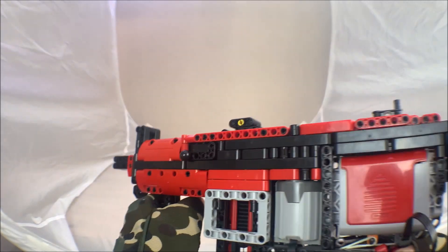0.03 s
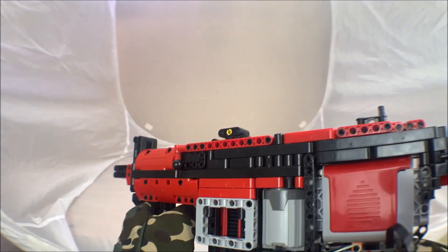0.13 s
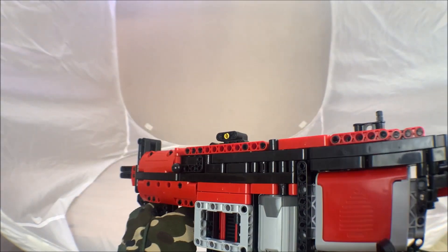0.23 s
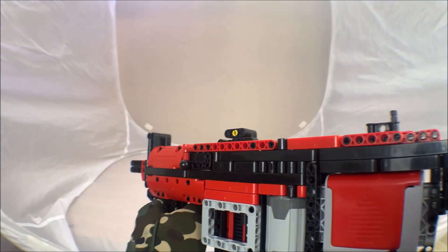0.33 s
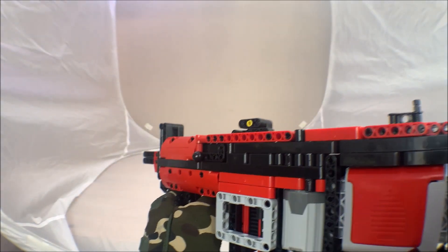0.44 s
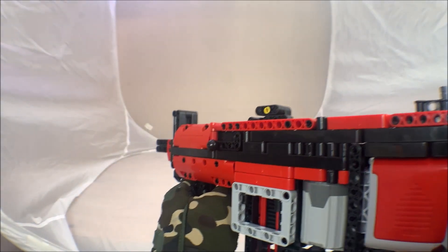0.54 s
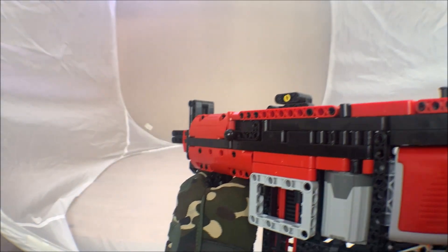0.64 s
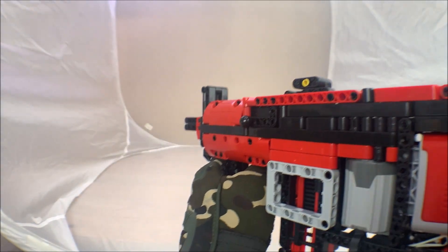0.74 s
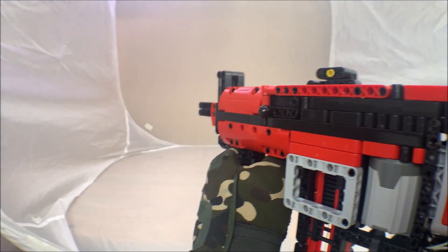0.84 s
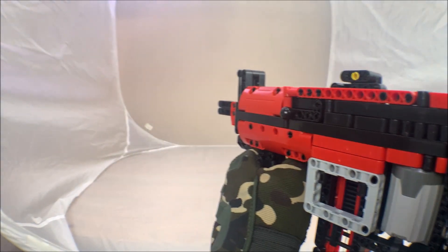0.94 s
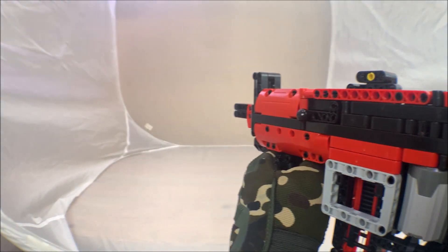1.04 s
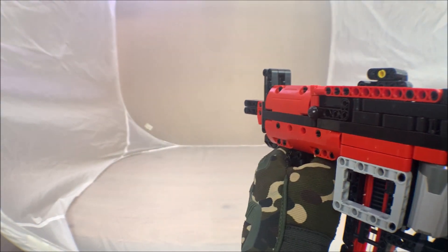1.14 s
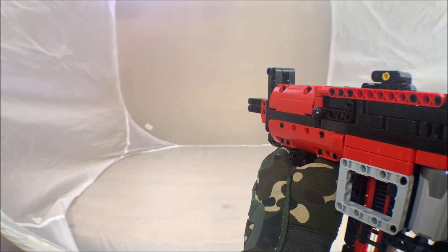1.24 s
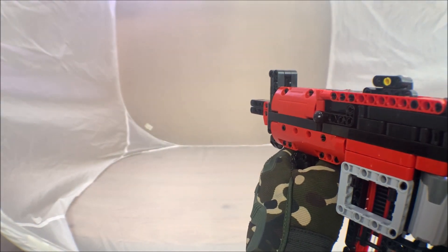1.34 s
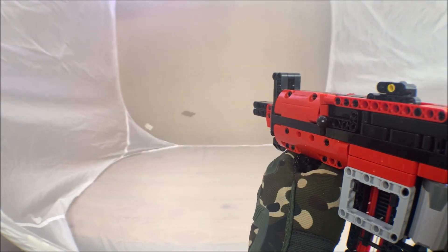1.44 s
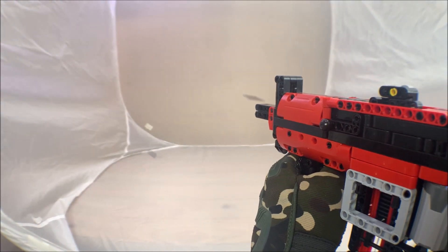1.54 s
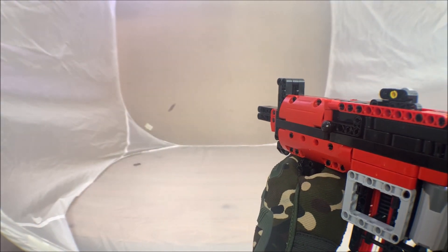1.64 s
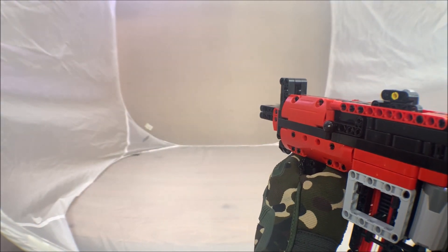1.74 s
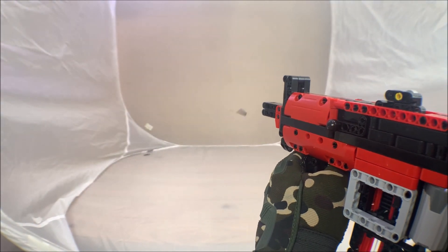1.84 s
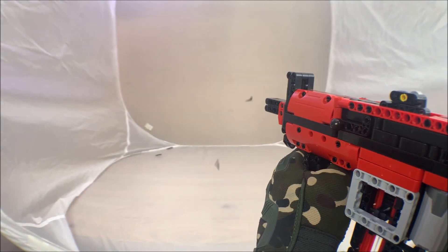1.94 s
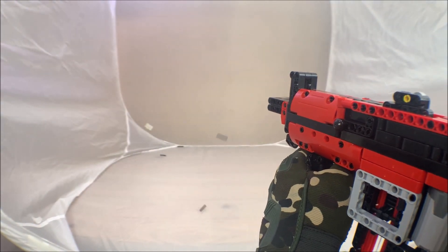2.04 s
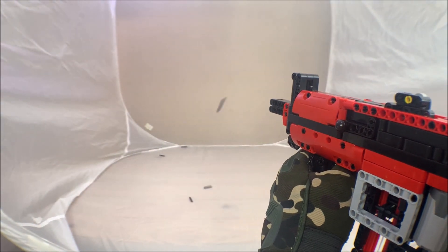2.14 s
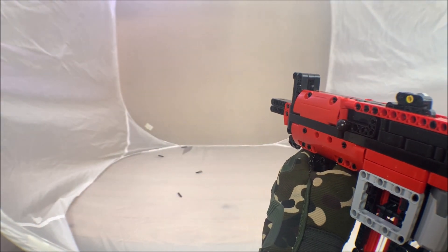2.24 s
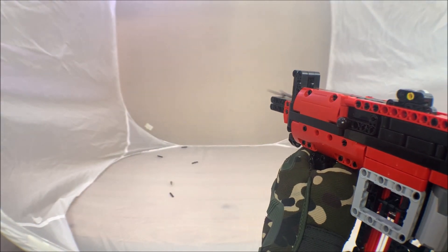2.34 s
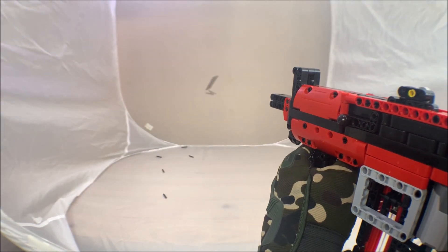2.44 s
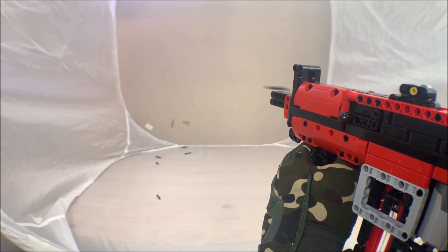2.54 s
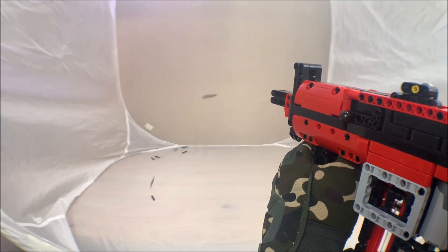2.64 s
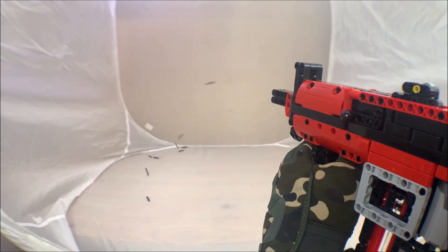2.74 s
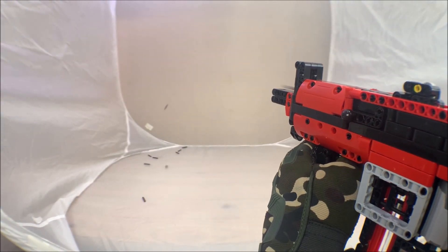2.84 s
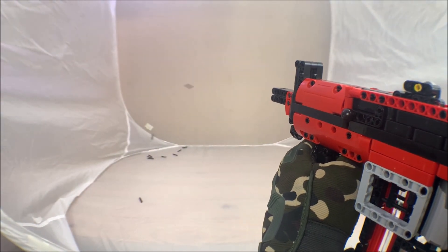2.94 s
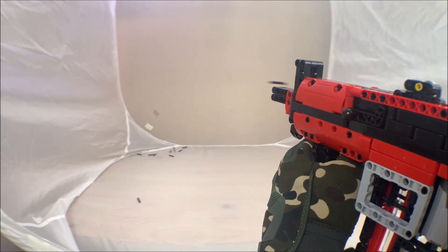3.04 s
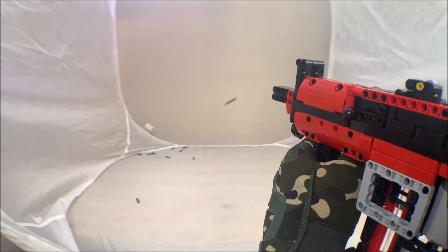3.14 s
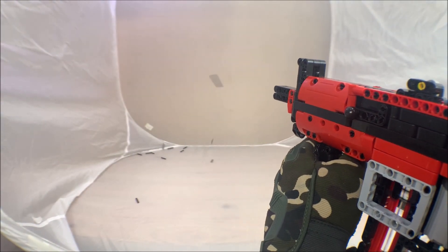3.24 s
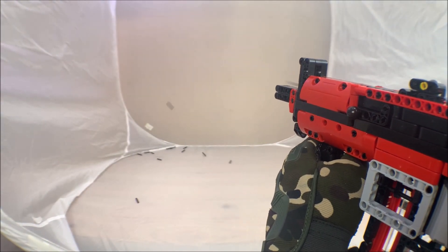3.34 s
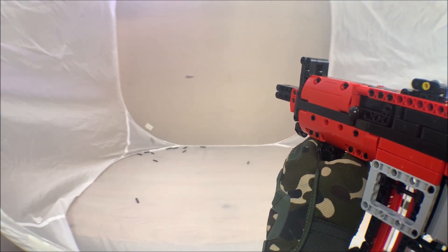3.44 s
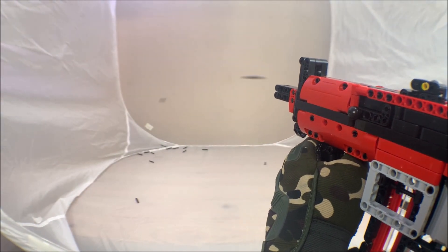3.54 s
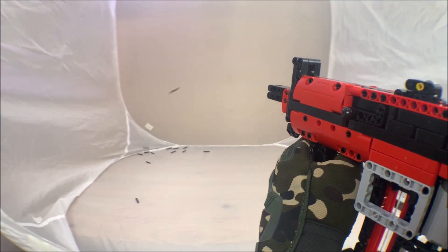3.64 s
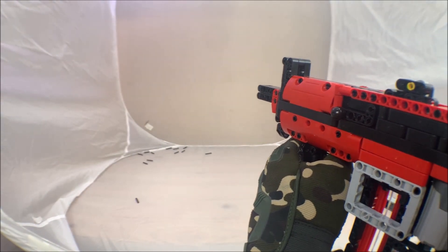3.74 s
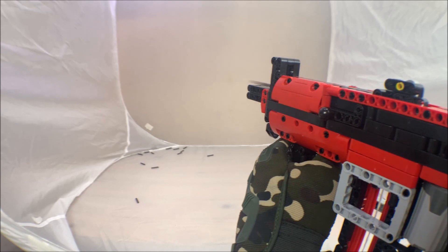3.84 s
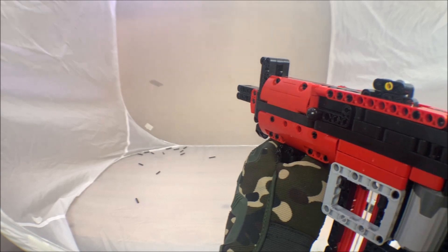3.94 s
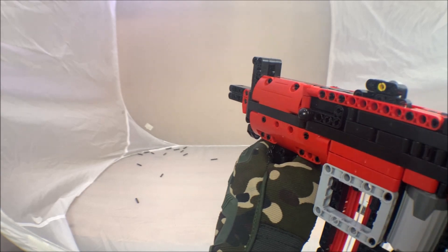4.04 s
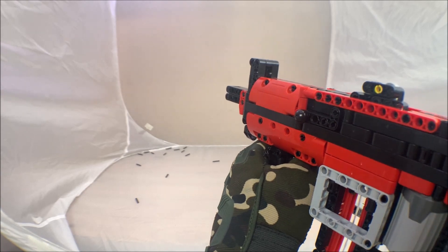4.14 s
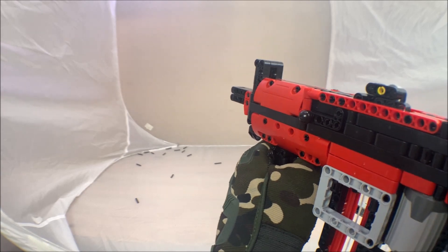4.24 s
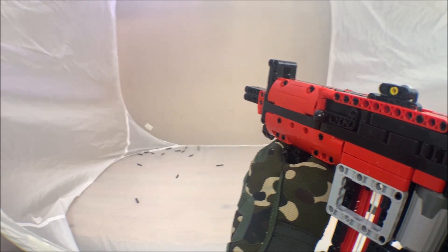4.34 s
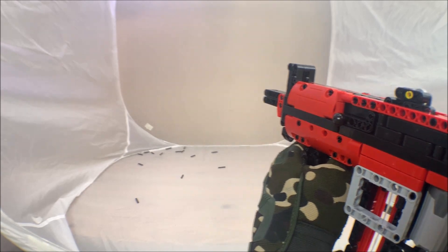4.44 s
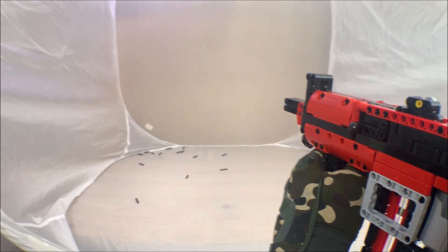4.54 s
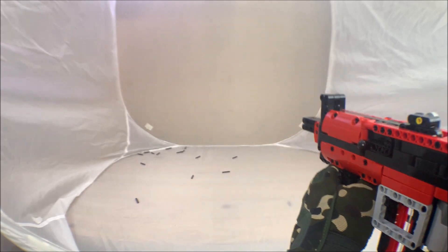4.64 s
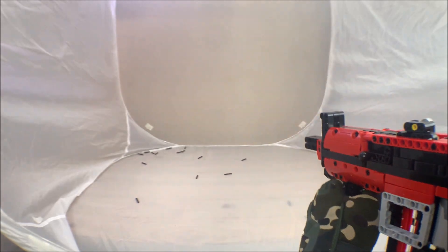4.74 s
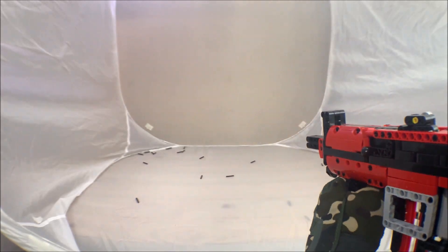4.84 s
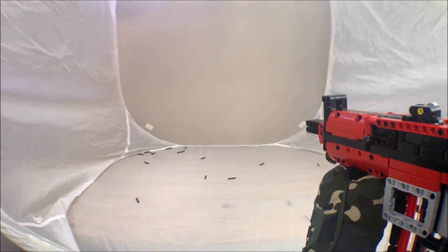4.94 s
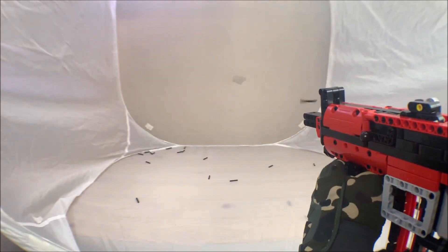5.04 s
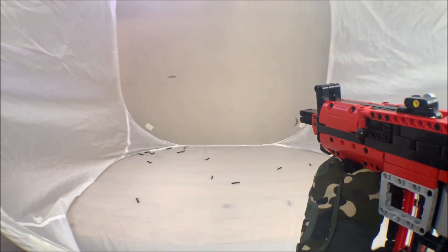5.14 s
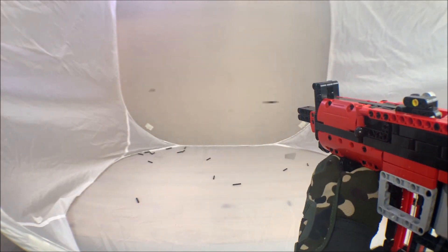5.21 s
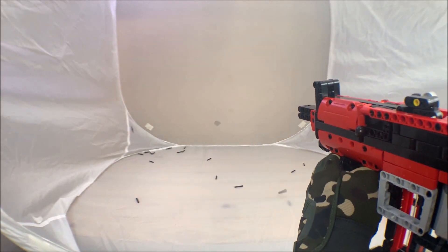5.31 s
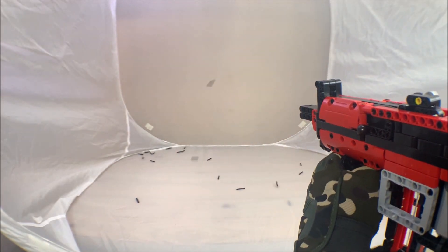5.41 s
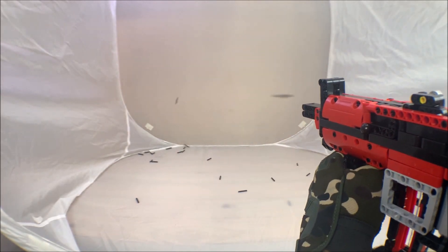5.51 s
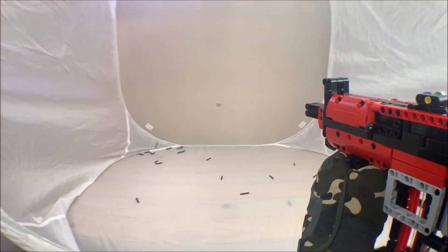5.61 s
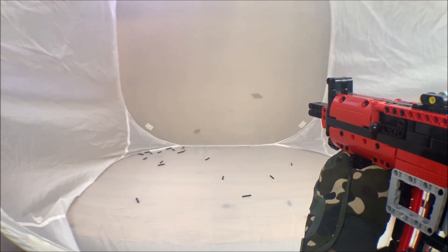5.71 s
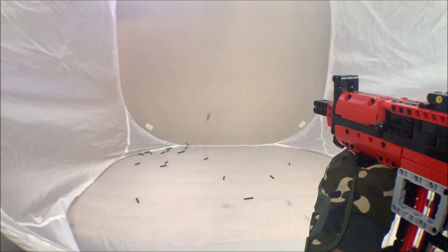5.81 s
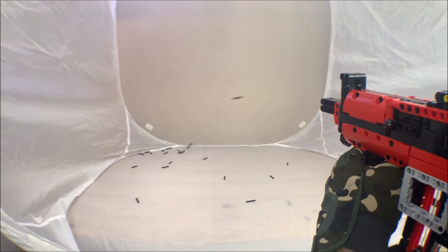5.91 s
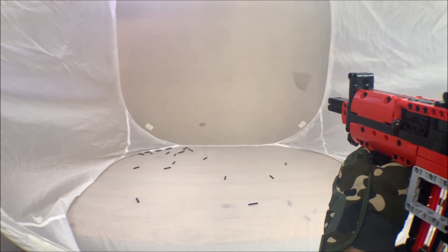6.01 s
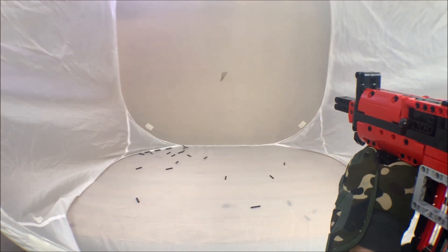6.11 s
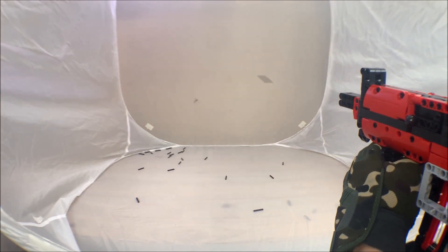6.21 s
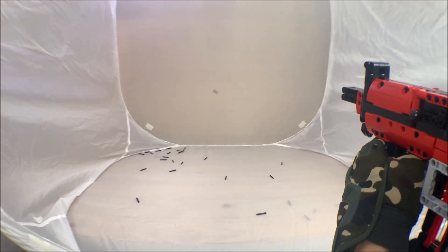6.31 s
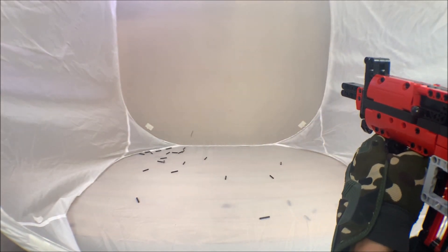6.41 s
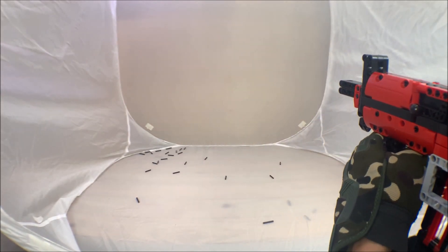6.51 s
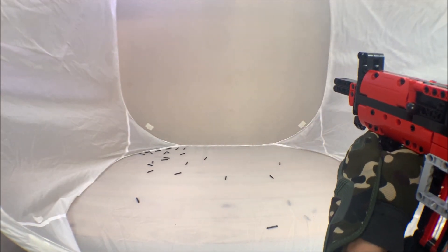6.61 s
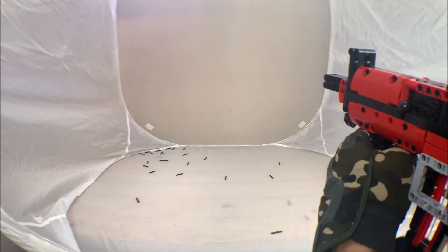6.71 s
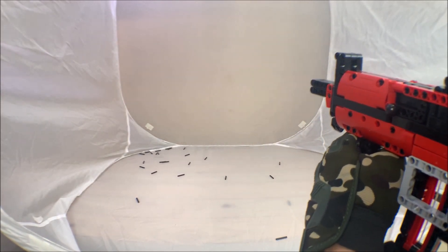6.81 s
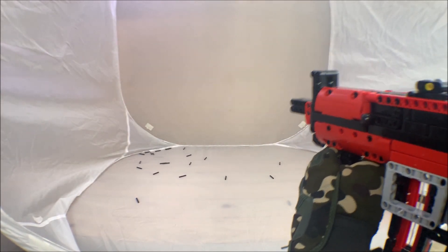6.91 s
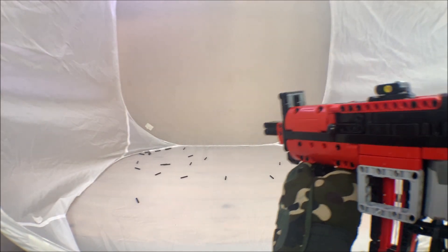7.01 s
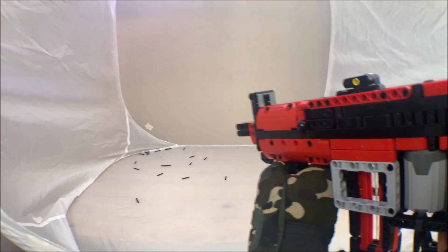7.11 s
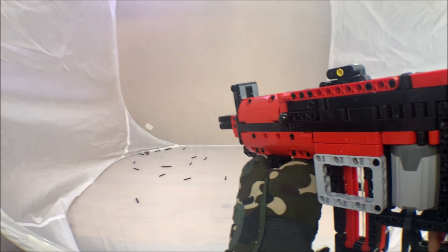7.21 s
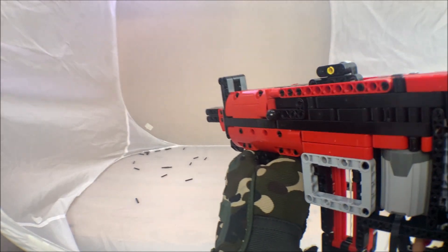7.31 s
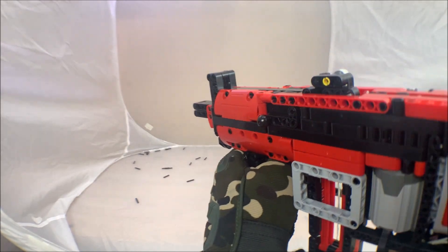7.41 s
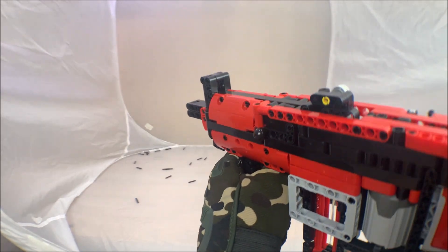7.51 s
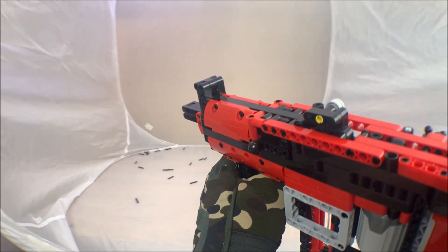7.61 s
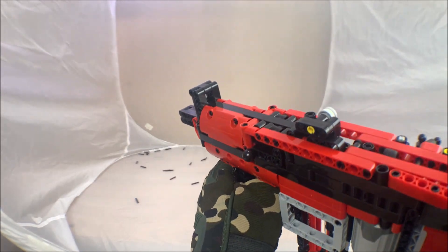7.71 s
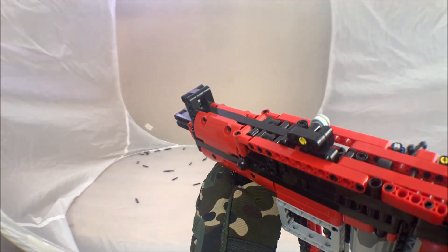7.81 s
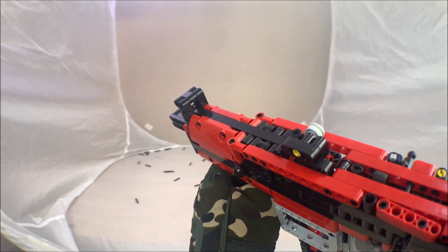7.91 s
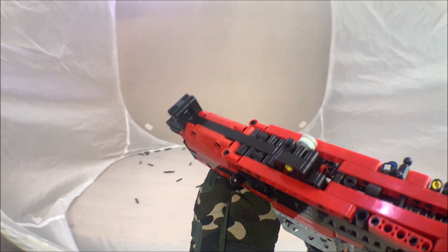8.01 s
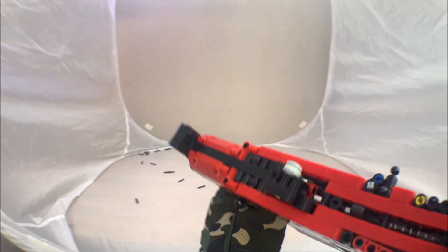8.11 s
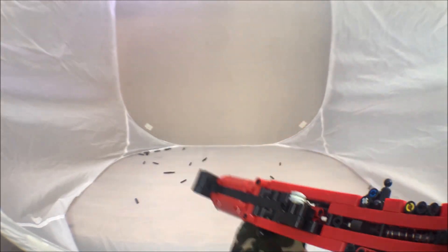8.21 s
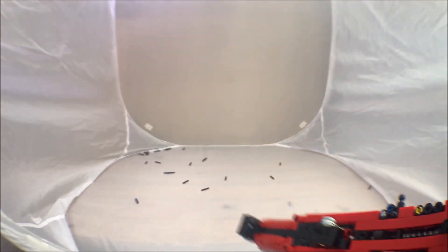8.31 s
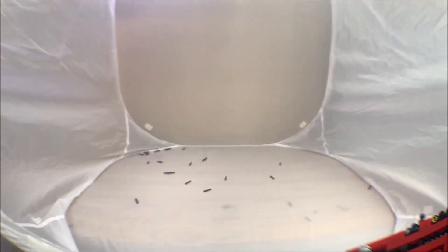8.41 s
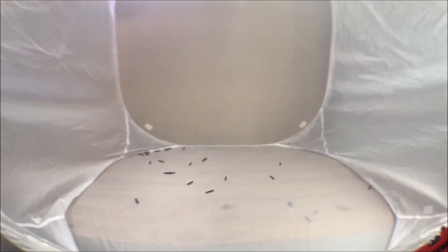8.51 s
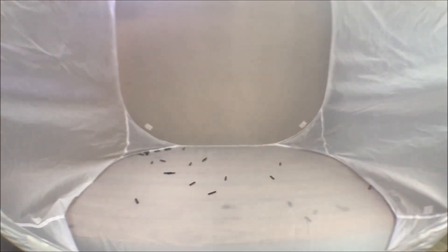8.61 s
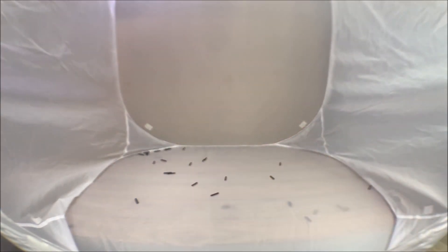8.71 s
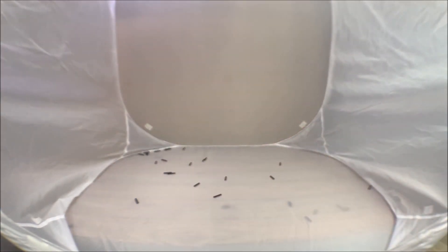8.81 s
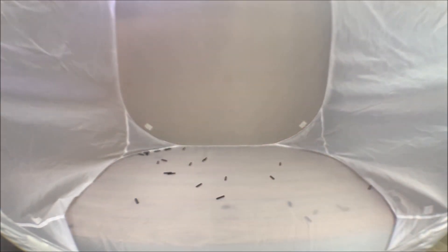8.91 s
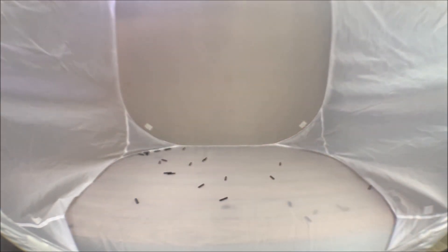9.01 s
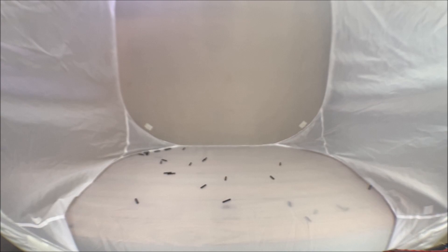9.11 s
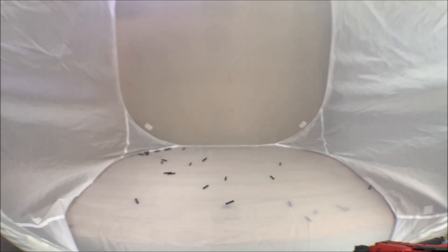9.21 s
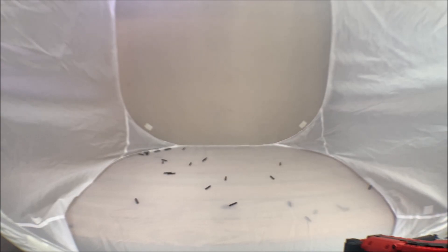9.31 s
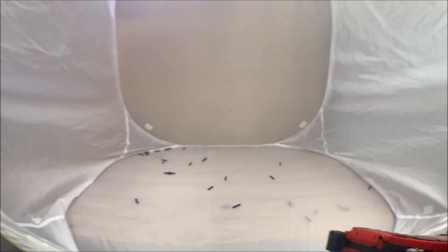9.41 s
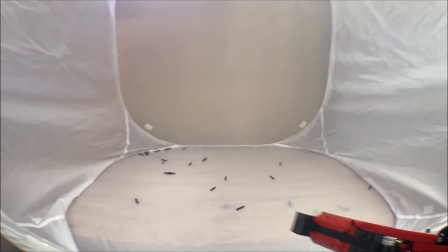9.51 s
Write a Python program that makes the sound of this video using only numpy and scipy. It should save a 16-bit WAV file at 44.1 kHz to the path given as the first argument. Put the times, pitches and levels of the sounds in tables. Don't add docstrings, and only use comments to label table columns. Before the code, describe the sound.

After a second of quiet handling, a small electric motor whirs up and drives a toy gun in one continuous run of bright, hard plastic clacks, evenly spaced. Gear chatter and a rising and falling whine fill the gaps, with small ticks and occasional dull pellet thuds on cloth. The firing ends cleanly; light creaks and knocks follow. Near microphone, dry tent, very short reverberation.

```python
import sys
import numpy as np
from scipy import signal
from scipy.fft import rfft, irfft, next_fast_len
from scipy.io import wavfile
from scipy.ndimage import uniform_filter1d

SR = 44100
rng = np.random.default_rng(int(sys.argv[2]) if len(sys.argv) > 2 else 0)


def elevation(decibels):
    levels = np.asarray(decibels, float)
    return 10 ** (levels / 20)


def master(y):
    cut = np.clip(np.atleast_2d(y).T, -1, 1)
    pcm = np.round(cut * 32767)
    wavfile.write(sys.argv[1], SR, pcm.astype(np.int16))


N = 421141

# (time [s], level [dB])
AIR_LEVEL = [
    (0, -63),
    (1.2, -66),
    (1.6, -68.5),
    (7.4, -72),
    (7.7, -72),
    (9.55, -71.5),
]
# (frequency [Hz], density [dB per Hz])
AIR = [(65, -31.5), (110, -4.5), (199, -6.5), (244, -4.5), (316, -11), (478, -16), (535, -19.5),
       (1100, -28), (1260, -37.5), (2010, -24), (2950, -34.5), (3300, -27.5), (3520, -39), (5000, -49.5),
       (6500, -84), (11000, -120)]
# (frequency [Hz], density [dB per Hz])
RUMBLE = [(20, -21), (45, 7.5), (63, 7.5), (90, 9), (140, -48)]
# (frequency [Hz], density [dB per Hz])
RUSTLE = [(3000, -12), (5000, -11.5), (11000, -10), (11900, -18.5), (13000, -5.5), (14500, -15.5),
          (15200, -54.5)]
# (frequency [Hz], peak level [dB])
FAN = [(129.2, -76.5), (947.5, -86.5), (1065, -91), (1125, -90.5), (1556, -102), (2051, -90), (2250, -83.5),
       (3187, -84), (4420, -102)]
# (time [s], rumble level [dB], half length [s])
GRIPS = [(0, -63, 0.25), (.55, -50.5, 0.0095), (0.652, -55.5, 0.045), (.83, -67, 0.099), (1.17, -55, 0.068),
         (2.254, -72, 0.057), (3.542, -68, 0.018), (3.712, -63.5, 0.034), (4.077, -81, 0.082),
         (4.535, -64, 0.072), (5.103, -67, 0.04), (6.351, -65, 0.066), (6.565, -65, 0.093),
         (7.187, -65.5, 0.083), (9.425, -66.5, 0.057)]
# (time [s], rustle level [dB], half length [s])
RUBS = [(0, -66.5, 0.042), (.3, -75.5, 0.21), (0.89, -79, 0.13), (1.116, -73, 0.065), (7.57, -73.5, 0.053),
        (8.426, -81, 0.038), (8.501, -80, 0.032), (8.58, -81, 0.036), (8.717, -79, 0.042),
        (8.934, -78.5, 0.045), (9.16, -89, .03)]
# (time [s], length [s], lowest [Hz], highest [Hz], rms level [dB])
SQUEAKS = [
    (.145, .32, 12300, 13900, -82),
    (.235, .22, 12350, 12950, -79),
    (.15, .2, 9650, 10300, -92),
]
# (time [s], peak level [dB],
# pitch [Hz])
THUDS = [(0.989, -45.5, 1420), (3.001, -42, 555), (3.1759, -40, 1060), (3.1779, -28.5, 1100),
         (3.5256, -25, 1750), (3.528, -41.5, 530), (3.6097, -29, 930), (3.843, -41, 990),
         (4.15, -42.5, 554), (5.288, -47, 755), (5.305, -30.5, 860), (5.62, -36, 795), (5.6255, -33.5, 570),
         (5.7976, -25.5, 1100), (5.802, -37.5, 796), (5.9977, -28.5, 1880), (6, -45.5, 264),
         (6.306, -30, 714), (6.4257, -30.5, 556), (6.432, -34.5, 493)]
# (time [s], peak level [dB], casing knock re peak [dB])
CREAKS = [(0.1397, -52, 0), (0.481, -64, 4), (0.5793, -58.5, -21), (0.844, -61, -20), (0.8578, -47.5, -27),
          (0.9633, -56.5, -18), (1.0918, -49.5, -2.5), (7.6492, -71, 3), (7.7544, -74, -11),
          (7.8144, -69.5, -9), (7.9239, -46, 4), (8.0466, -61.5, 13), (8.0615, -59.5, 5),
          (8.1789, -54.5, -25), (8.2724, -76, 12), (8.281, -76.5, 21), (8.292, -72, 18), (8.3424, -79, 21),
          (8.3804, -59, 0), (8.4194, -78, -10), (8.4994, -65, -14), (8.683, -58.5, 4), (8.7187, -65, -10),
          (9.1539, -75.5, -16.5), (9.4894, -75, -8.5), (9.5344, -72, 14)]
# (frequency [Hz], density [dB per Hz])
CREAK = [(400, -38), (1200, 2), (2200, 2), (4500, 3.5), (8000, 2.5), (11000, 2.5), (14000, 6), (15500, 5),
         (16400, -45)]
# (frequency [Hz], width [Hz], level [dB])
HELD = [(1000, 200, -18), (1500, 150, -2.5), (1760, 100, 3), (2180, 130, -1.5), (2700, 300, -11)]
# (frequency [Hz], width [Hz], level [dB])
CASING = [(358.3, 42, -9), (492.6, 69, -7), (780, 26, -3), (1210, 71, -0.5), (1750, 570, -3.5),
          (2050, 130, 12), (2147, 253, 6.5), (2600, 71, -5)]
# (time [s], gear whirr level [dB], whine and hum level [dB])
MOTOR = [
    (1.1, -87.5, -51),
    (1.184, -59.5, -46),
    (1.306, -67, -44.5),
    (1.43, -51.5, -56.5),
    (1.53, -48, -51.5),
    (3.9, -51.5, -49),
    (5.3, -49, -50.5),
    (7.47, -50.5, -49.5),
    (7.55, -66, -46.5),
]
# (frequency [Hz], density [dB per Hz])
WHIRR = [(400, -22.5), (1000, -15), (1500, -6), (2800, -6.5), (3400, -9.5), (4300, -6), (6000, -6),
         (8500, -5), (13500, -5.5), (15000, -12.5), (15800, -1), (16100, -77.5)]
# (share of cycle [1], commutator [Hz], whine level [dB])
STROKE = [(0, 540, -18), (.2, 690, -16), (.34, 745, -16), (.46, 765, -10), (.54, 768, 1), (.63, 725, 1),
          (.72, 650, 0), (.82, 575, -1), (.9, 530, -2), (1, 490, -14)]
# (share of cycle [1], whirr level [dB])
LOAD = [(0, 0.5), (.3, -4.5), (.5, -4), (.58, -7), (.64, -3.5), (.84, -4.2), (.9, -5.5), (.93, -4), (1, -7)]
# (frequency [Hz], level [dB])
WHINE = [(500, -34), (760, -21), (1150, -20), (1500, -8), (1800, -5), (2250, 0), (2800, -2), (3100, -13),
         (3500, -17), (4000, -11), (4500, -10), (5200, -22)]
# (time [s], peak level [dB], casing knock re peak [dB])
LOOSE = [(1.1372, -37.5, 0.5), (1.1545, -38, -26.5), (1.1655, -26.5, 10), (1.198, -38, -44),
         (1.357, -24, -7), (1.9314, -24, -16.5), (3.08, -25.5, -19), (3.7397, -17, -6.5), (5.1745, -32, 5),
         (5.4392, -30, -20), (5.4957, -33, -2.5), (5.812, -29, -36), (5.989, -35, -30), (7.446, -35.5, 7)]
# (time [s], peak level [dB], casing knock re peak [dB])
CATCH = [(1.549, -23.5, -10), (1.715, -20.5, -17.5), (2.042, -22.5, -8), (2.201, -27, -14),
         (2.3675, -24, -14.5), (2.698, -21, -6), (3.032, -25, -12), (3.3728, -29, -8),
         (3.7055, -25.5, -1.5), (3.867, -27, -9), (4.035, -27.5, -4), (4.368, -36, -18), (4.704, -35.5, -4),
         (5.038, -27, -11.5), (5.196, -32, -15.5), (5.36, -31, 1.5), (5.691, -33, -11.5),
         (6.0267, -24.5, -10), (6.364, -26, -12.5), (6.702, -29, -9.5), (7.034, -42, -10)]
# (time [s], push level [dB], drop level [dB], drop delay [s])
FEEDS = [(1.486, -22.5, -26.5, 0.019), (1.6589, -26, -28.5, 0.02), (1.8278, -24, -29, .022),
         (1.989, -23.5, -29, 0.023), (2.15, -22.5, -29.5, 0.024), (2.314, -21, -30.5, 0.021),
         (2.4781, -21.5, -26, 0.024), (2.646, -20.5, -30, 0.022), (2.81, -19, -28, 0.025),
         (2.978, -23.5, -27.5, 0.018), (3.143, -23.5, -32, 0.033), (3.317, -29.5, -40.5, 0.022),
         (3.486, -22, -26, .022), (3.652, -39, -31, .0225), (3.814, -24.5, -27, 0.02),
         (4.9816, -35, -53, 0.016), (5.3185, -23.5, -44.5, 0.023), (5.638, -28.5, -43, 0.023)]
# (time [s], peak level [dB], casing knock re peak [dB])
FED_SHOTS = [(1.37, -10.5, -13), (1.5561, -7, -26), (1.7207, -11.5, -11.5), (1.889, -12.5, -7),
             (2.0479, -11.5, -9.5), (2.2131, -13, -6.5), (2.3749, -12, -9.5), (2.5425, -11.5, -39),
             (2.708, -10, -14), (2.8748, -10.5, -14.5), (3.0402, -9.5, -33), (3.2096, -10.5, -18),
             (3.3806, -11.5, -10.5), (3.5475, -12, -13.5), (3.7131, -10.5, -12.5), (3.8775, -11.5, -14)]
# (time [s], peak level [dB], casing knock re peak [dB])
LATE_SHOTS = [(4.044, -10.5, -15.5), (4.2098, -12.5, -10), (4.377, -12, -15.5), (4.5453, -10, -10.5),
              (4.714, -9.5, -19.5), (4.8838, -16, -10), (5.047, -11, -20.5), (5.2077, -14, -17.5),
              (5.369, -11, -50), (5.5357, -12.5, -14.5), (5.7, -11, -25.5), (5.869, -11.5, -13.5),
              (6.035, -10.5, -13), (6.2049, -10, -35), (6.3724, -10.5, -38), (6.5412, -12, -13.5),
              (6.7117, -10.5, -18), (6.8765, -11.5, -18), (7.0432, -11, -15.5), (7.2088, -10.5, -17),
              (7.375, -10, -14.5)]
# (frequency [Hz], density [dB per Hz])
SLAM = [(150, -27), (400, -25.5), (1000, -18.5), (2200, -5), (3400, -10.5), (4200, -6.5), (6000, -4),
        (8000, -1), (9800, -0.5), (11000, 3.5), (14100, 1.5), (14750, -4), (15600, 3.5), (16000, -17.5),
        (17000, -46.5)]
# (time [s], left-right level [dB])
AIM = [
    (1.3, -2.5),
    (4.4, 0.5),
    (6.5, -0.5),
    (7.4, -1),
]
# (frequency [Hz], coherence [1])
ALIKE = [(60, 0.52), (400, 0.49), (1500, 0.76), (2500, 0.3), (3300, 0.064), (4000, 0.56), (4700, 0.61),
         (6300, 0.46), (8300, 0.43), (9800, 0.19), (10500, 0.89), (16000, 0.94)]
# (frequency [Hz], left-right level [dB])
LEAN = [(300, -1), (700, -4.5), (2500, 1.5), (5500, -3), (7800, -0.5), (8300, -17), (9600, 7),
        (10200, -0.5)]
# (frequency [Hz], lag of the left [cycles])
TRAIL = [(250, 0), (500, .17), (1100, .2), (1500, .36), (2000, .36), (2500, .48), (2900, .58), (3750, .94),
         (4150, .95), (5170, .48), (6200, -.03), (7235, -.5), (8270, -.84), (8800, -.408)]
# (time [s], depth [dB])
DIPS = [(1.71, -13), (3.865, -13), (4.032, -10), (5.358, -10), (5.528, -13), (5.861, -10), (6.021, -10),
        (6.192, -18), (6.3595, -20), (6.532, -20), (6.697, -7)]

RUMBLE_DB, CLOTH_DB = -73.5, -87.5
BILLOW_DB, BILLOW_S = -34, 0.053
DENT_CYCLES, DENT_SAG_PER_S = 0.92, 33
FLAP_DB, CLOTH_CUT_HZ = -7, 2100
CHATTER_PER_S, CHATTER_DB = 110, -11
FRAME_BELOW_HZ, SOFT_BELOW_HZ = 1400, 6800
PUSH_KNOCK_DB, DROP_KNOCK_DB = -37, 3
LEFT_LAG_S, LAG_FROM_HZ = .0002945, 8800
TENT_DB, TENT_T60_S, EARLY_T60_S, EARLY_GAIN = -30, .3, 0.039, 4.1
CEILING, DIP_S, CUTOFF_HZ = .6, .0018, 17100


def rms_one(x):
    return x / np.sqrt(np.mean(x ** 2) + 1e-20)


def in_time(rows):
    s, *columns = np.transpose(rows)
    return [np.interp(np.arange(N) / SR, s, c) for c in columns]


def at_hz(points, size):
    hz = np.maximum(np.fft.rfftfreq(size, 1 / SR), 1)
    table_hz, values = np.transpose(points)
    return np.interp(np.log(hz), np.log(table_hz), values)


def colour(x, spectrum):
    size = next_fast_len(x.shape[-1])
    return irfft(rfft(x, size) * elevation(at_hz(spectrum, size)), size)[..., :x.shape[-1]]


def drift(rate):
    knots = rng.standard_normal(int(N / SR * rate) + 2)
    return np.interp(np.arange(N) / SR * rate, np.arange(len(knots)), knots)


def resonate(x, hz, width_hz):
    r = np.exp(-np.pi * width_hz / SR)
    poles = [1, -2 * r * np.cos(2 * np.pi * hz / SR), r * r]
    return signal.lfilter([(1 - r * r) / 2, 0, (r * r - 1) / 2], poles, x)


def casing(x, shift_db, detune=1, modes=CASING):
    out = 0
    for k, ((hz, width_hz, db), shift) in enumerate(zip(modes, shift_db)):
        sign = (-1) ** max(k, 2)
        out = out + sign * elevation(db + shift) * resonate(x, hz * detune, width_hz)
    return out


def patchy(x, spread_db, rate):
    edges = 700 * 2 ** np.arange(0, 5, .5)
    out = 0
    for k, pair in enumerate(zip(edges, edges[1:])):
        band = signal.butter(1, pair, "band", fs=SR, output="sos")
        out = out + elevation(spread_db * (1 - k / 16) * drift(rate)) * signal.sosfilt(band, x)
    return out


def swells(floor, events):
    t = np.arange(0, N / SR + .002, .002)
    power = elevation(2 * np.interp(t, *np.transpose(floor)))
    for s, db, half_s in events:
        power = power + elevation(2 * db) * np.exp(-((t - s) / half_s) ** 2)
    return np.interp(np.arange(N) / SR, t, np.sqrt(power))


def add(out, s, sound):
    at = round(s * SR)
    out[:, at:at + sound.shape[1]] += sound[:, :N - at]


def fan(white):
    t = np.arange(N) / SR
    out = 0
    for hz, width_hz, db in [(2030, 130, -83.0), (2200, 76, -90), (1000, 170, -86.5), (1443, 300, -104)]:
        out = out + elevation(db) * rms_one(resonate(resonate(white, hz, width_hz), hz, width_hz))
    out = out * elevation(np.interp(t, [0, 1.1, 1.4], [7, 6, 0]))
    for hz, db in FAN:
        out += elevation(db) * (np.sin(2 * np.pi * hz * t) + 0.16 * rms_one(resonate(white, hz, 25)))
    return out


def room():
    billows = [(s + BILLOW_S / 2, db + BILLOW_DB, BILLOW_S) for s, db, hz in THUDS]
    white = rng.standard_normal((4, 2, N))
    shared = np.array([1.7, 0.92, 0.2, 0.55])[:, None, None]
    white = white + shared * white[::-1, :1]
    out = swells([(0, RUMBLE_DB)], GRIPS) * elevation(1.4 * drift(44)) * rms_one(colour(white[0], RUMBLE))
    out += swells(AIR_LEVEL, billows) * elevation(-0.5 + 1.3 * drift(7.2)) * rms_one(colour(white[1], AIR))
    rustle = patchy(colour(white[2], RUSTLE), spread_db=8.5, rate=14)
    out += swells([(0, CLOTH_DB)], RUBS) * rms_one(rustle)
    return out + fan(white[3])


def squeaks():
    out, t = 0, np.arange(N) / SR
    for s, length_s, low_hz, high_hz, db in SQUEAKS:
        arch = np.sin(np.pi * np.clip((t - s) / length_s, 0, 1))
        pitch_hz = low_hz + (high_hz - low_hz) * arch + 190 * drift(140)
        tone = np.sqrt(2) * np.sin(2 * np.pi * np.cumsum(pitch_hz) / SR)
        out = out + elevation(db + 4 * drift(60)) * np.minimum(6 * arch, 1) * tone
    return out


def thuds():
    out, t = np.zeros((2, N)), np.arange(2048) / SR
    cloth = signal.butter(2, CLOTH_CUT_HZ, fs=SR, output="sos")
    for s, db, hz in THUDS:
        sag = 1 - DENT_SAG_PER_S * np.minimum(t, .006)
        dent = np.sin(2 * np.pi * hz * t * sag) * np.exp(-t * hz / DENT_CYCLES)
        dent *= 1 - np.exp(-t / 0.00039)
        noise = rng.standard_normal((3, len(t)))
        ragged = elevation(np.repeat(rng.normal(0, 3, 16), 128))
        flap = resonate((noise[:2] + .4 * noise[2]) * ragged * np.exp(-t / .018), hz, 900)
        sound = np.array([0.7 * dent, 0.95 * np.roll(dent, shift=4)])
        sound += elevation(FLAP_DB) * flap / abs(flap).max()
        add(out, s, elevation(db + 6.5) * signal.sosfilt(cloth, sound))
    return out


def commutator(stroke, teeth):
    share, pitch_hz, whine_db = np.transpose(STROKE)
    spin = np.interp(np.arange(N) / SR, [1.17, 1.37], [.72, 1])
    wander = 1 + .025 * drift(9) + .014 * drift(150)
    turns = np.cumsum(np.interp(stroke, share, pitch_hz) * spin * wander) / SR
    brushes = 0
    for k in range(1, 9):
        phase = rng.uniform(0, 2 * np.pi, (2, 1))
        brushes = brushes + elevation(4 * drift(60) + 1.5 * drift(16)) * np.cos(2 * np.pi * k * turns + phase)
    whine = rms_one(colour(brushes * (1 + 0.29 * teeth), WHINE))
    return spin ** 40 * elevation(np.interp(stroke, share, whine_db)) * whine


def loose_pins(teeth):
    clicks = np.tanh(teeth / 4) * (rng.random(N) < CHATTER_PER_S / SR) + 1e-18
    modes_hz = [2930, 3935, 4830, 5900]
    return rms_one(sum(resonate(np.roll(clicks, 997 * k, axis=1), hz, 330) for k, hz in enumerate(modes_hz)))


def motor():
    whirr_db, hum_db = in_time(MOTOR)
    t = np.arange(N) / SR
    shots = np.r_[LOOSE[2][0], np.array(FED_SHOTS + LATE_SHOTS)[:, 0]]
    stroke = np.interp(t, np.r_[shots, shots[-1] + .17], np.arange(len(shots) + 1)) % 1
    bite_db = 5.0 * np.minimum(rng.exponential(1, N), 4) + 3.5 * np.clip(drift(110), -3, 2)
    teeth = rng.standard_normal((2, N)) * elevation(bite_db)
    whine = commutator(stroke, teeth)
    load_db = np.interp(stroke, *np.transpose(LOAD))
    whirr = rms_one(patchy(colour(teeth, WHIRR), spread_db=4.0, rate=35))
    whirr = elevation(whirr_db + 5.0 + load_db) * whirr
    shares_db = [4.0 * drift(30) - .7 * db for hz, width_hz, db in CASING]
    hum = elevation(-11 + load_db) * rms_one(casing(teeth, shares_db))
    chatter = elevation(whirr_db + CHATTER_DB) * loose_pins(teeth)
    running = np.interp(t, [1.12, 1.17, 7.46, 7.52], [0, 1, 1, 0])
    return running * (whirr + chatter + elevation(hum_db + 2.0) * (whine + hum))


def contact_force(t, count, spread_s, crack_s, shudder_s, shudder_db, slide_db):
    jitter = rng.uniform(-.3, .3, count - 1)
    delays = np.r_[0, spread_s * (np.arange(1, count) + jitter) / max(count - 1, 1)]
    sizes = elevation(rng.normal(0, 1.5, count) - 1.1 * np.arange(count))
    after = np.maximum(t - delays[:, None], 0)
    force = sizes @ ((after > 0) * np.exp(-after / crack_s))
    ragged = elevation(np.repeat(rng.normal(0, 4, 64), 64))
    force += elevation(shudder_db) * ragged * (t > 0) * np.exp(-t / shudder_s)
    force += elevation(slide_db) * (t <= 0) * (t > -.005) * np.exp(t / .0016)
    return force + 1e-18


def contacts(events, spectrum, knock_db, swell_s, modes=CASING, **impact):
    lead_s = .012
    out, t = np.zeros((2, N)), np.arange(4096) / SR - lead_s
    bass = signal.butter(2, FRAME_BELOW_HZ, "low", fs=SR, output="sos")
    low = signal.butter(2, [FRAME_BELOW_HZ, SOFT_BELOW_HZ], "band", fs=SR, output="sos")
    high = signal.butter(2, SOFT_BELOW_HZ, "high", fs=SR, output="sos")
    hump = np.hanning(round(2 * swell_s * SR) + 3)
    for s, db, body_db, *pan_db in events:
        force = contact_force(t, **impact)
        soft = np.sqrt(np.maximum(signal.fftconvolve(force ** 2, hump / hump.sum(), "same"), 0))
        late = signal.lfilter([1], [1, -np.exp(-1 / (swell_s * SR))], soft ** 2 + 1e-18)
        late = np.sqrt(late / late.max()) * soft.max()
        noise = rng.standard_normal((2, 2, len(t)))
        crack = signal.sosfilt(high, force * noise[0])
        crack += signal.sosfilt(low, soft * noise[1])
        crack += signal.sosfilt(bass, late * noise[0])
        crack = colour(crack, [(hz, d + rng.normal(0, 1.6)) for hz, d in spectrum])
        blow = np.roll(soft, len(hump) // 6) * noise[1]
        knock = casing(blow, rng.normal(0, 2.5, len(modes)), 1 + rng.normal(0, .035), modes)
        crack_peak, knock_peak = [np.sqrt(uniform_filter1d(np.sum(x ** 2, axis=0), size=130).max())
                                  for x in (crack, knock)]
        sound = crack / crack_peak + elevation(body_db + knock_db) * knock / knock_peak
        pan = elevation(sum(pan_db) * np.array([[.5], [-.5]]))
        add(out, s - lead_s, elevation(db - 5.0) * sound * pan)
    return out


def gun():
    aim_s, aim_db = np.transpose(AIM)
    shots = [(s, db, knock, np.interp(s, aim_s, aim_db)) for s, db, knock in FED_SHOTS + LATE_SHOTS]
    feeder = [(s, db, PUSH_KNOCK_DB) for s, db, *_ in FEEDS]
    feeder += [(s + after_s, db, DROP_KNOCK_DB) for s, _, db, after_s in FEEDS]
    out = contacts(CREAKS, CREAK, count=2, spread_s=0.0015, crack_s=0.00081, shudder_s=0.027,
                   shudder_db=-17.5, slide_db=-16, knock_db=-2.0, swell_s=0.0037, modes=HELD)
    out += contacts(feeder, SLAM, count=2, spread_s=0.0016, crack_s=0.0012, shudder_s=0.017,
                    shudder_db=-14.0, slide_db=-35.0, knock_db=-11.5, swell_s=0.00075)
    out += contacts(LOOSE + CATCH, SLAM, count=2, spread_s=0.001, crack_s=0.001, shudder_s=0.006,
                    shudder_db=-14, slide_db=-30, knock_db=-7.0, swell_s=.0008)
    out += contacts(shots, SLAM, count=6, spread_s=0.005, crack_s=0.00075, shudder_s=0.0049,
                    shudder_db=-14.0, slide_db=-19, knock_db=-4.5, swell_s=0.0065)
    return out


def ports(pair):
    size = next_fast_len(N)
    shared, own = rfft(pair, size)
    hz = np.fft.rfftfreq(size, 1 / SR)
    alike = np.clip(at_hz(ALIKE, size), 0, 1)
    lean = elevation(at_hz(LEAN, size) / 2)
    cycles = np.where(hz > LAG_FROM_HZ, LEFT_LAG_S * hz, at_hz(TRAIL, size))
    left = shared * np.exp(-2j * np.pi * cycles) * lean
    right = (alike * shared + np.sqrt(1 - alike ** 2) * own) / lean
    return irfft(np.array([left, right]), size)[:, :N]


def tent(x):
    t = np.arange(SR // 2) / SR
    white = rng.standard_normal((2, 2, len(t))) * (t > .003)
    tail = EARLY_GAIN * resonate(white[0], 3500, 9000) * elevation(-60 * t / EARLY_T60_S)
    tail += resonate(white[1], 2000, 1900) * elevation(-60 * t / TENT_T60_S)
    tail *= elevation(TENT_DB + 17.0) / np.sqrt(np.sum(tail ** 2) / 2)
    return signal.fftconvolve(x, tail, axes=1)[:, :N]


def scene():
    near = elevation(1.5) * ports(gun() + motor()) + thuds()
    return near + tent(near) + room() + squeaks()


def band_limit(x):
    return signal.sosfilt(signal.butter(12, 17130, fs=SR, output="sos"), x)


def record(dry):
    t = np.arange(N) / SR
    shape_s = DIP_S * np.array([-2, -1.9, 0.1, 0.32])
    dip_db = sum(np.interp(t, s + shape_s, [0, db, db, 0]) for s, db in DIPS)
    rounded = CEILING * np.tanh(elevation(dip_db) * dry / CEILING)
    top_cut = signal.cheby2(8, 45, CUTOFF_HZ, fs=SR, output="sos")
    return band_limit(signal.sosfilt(top_cut, rounded))


dry = scene()
out = record(dry)
master(out)
```